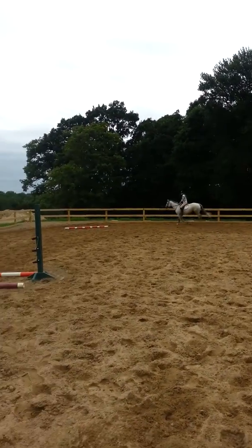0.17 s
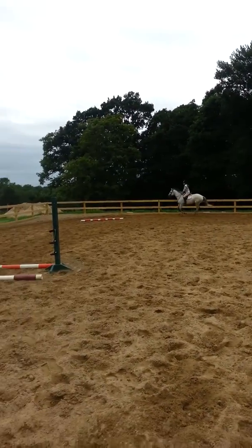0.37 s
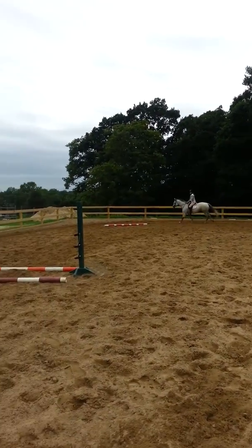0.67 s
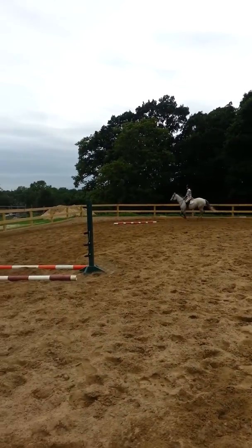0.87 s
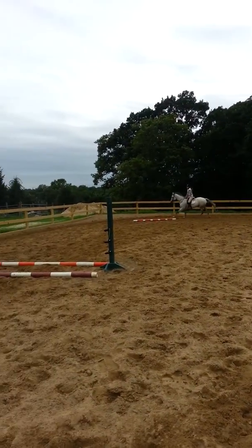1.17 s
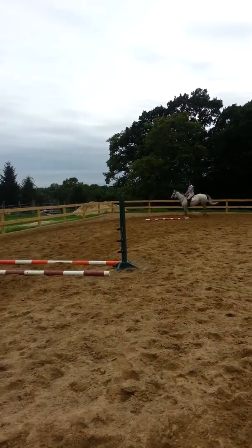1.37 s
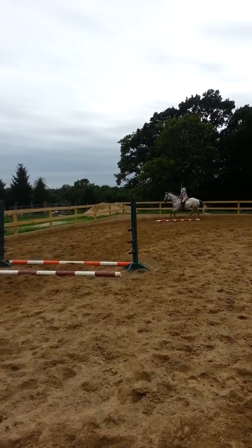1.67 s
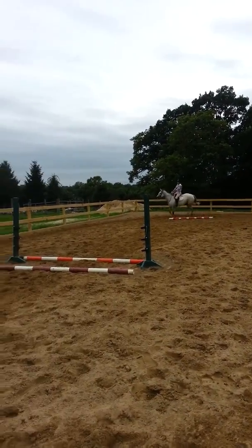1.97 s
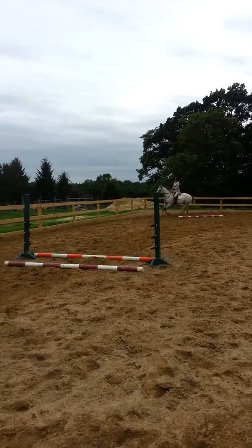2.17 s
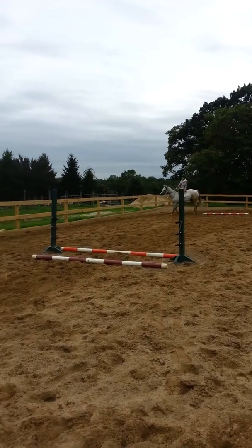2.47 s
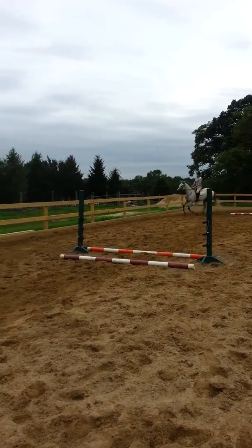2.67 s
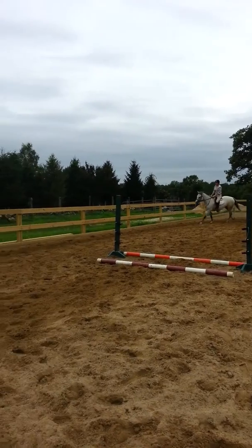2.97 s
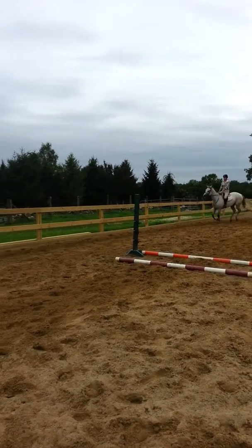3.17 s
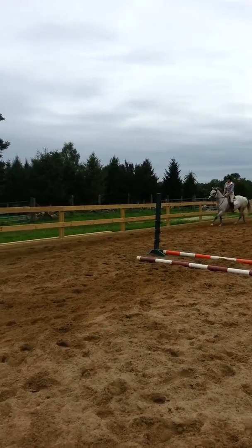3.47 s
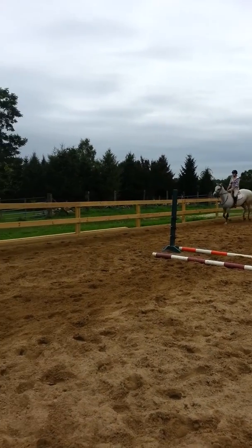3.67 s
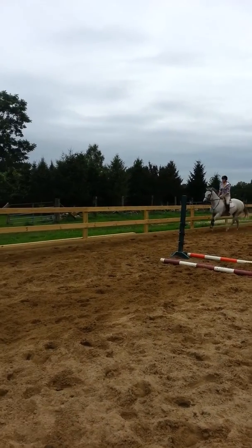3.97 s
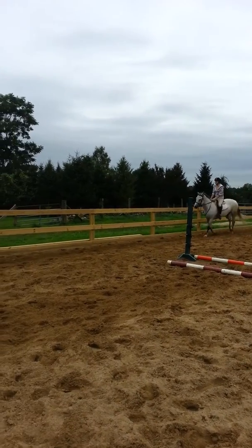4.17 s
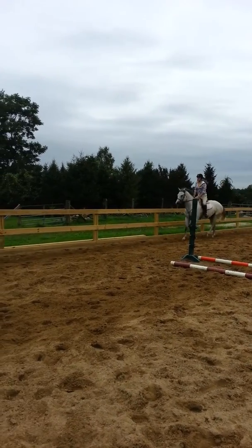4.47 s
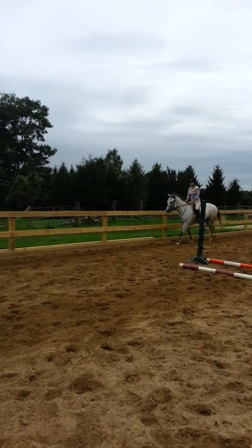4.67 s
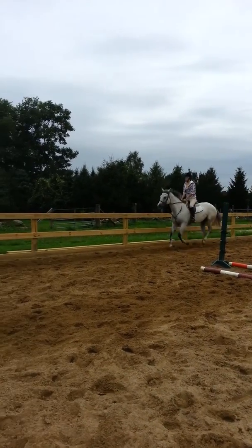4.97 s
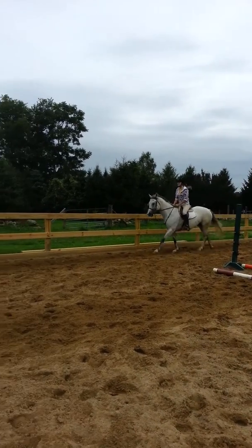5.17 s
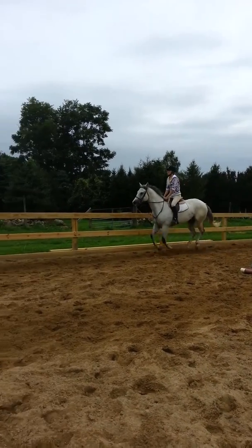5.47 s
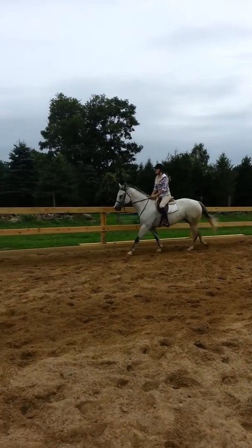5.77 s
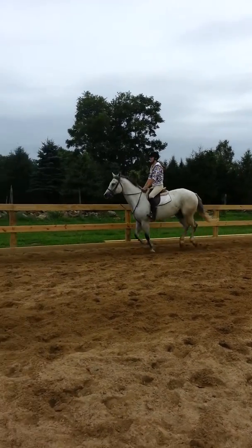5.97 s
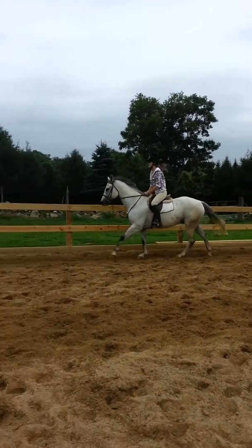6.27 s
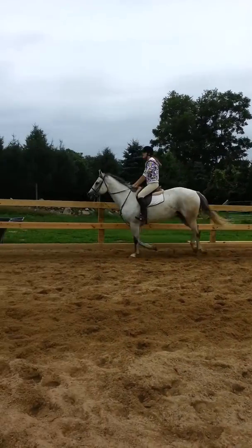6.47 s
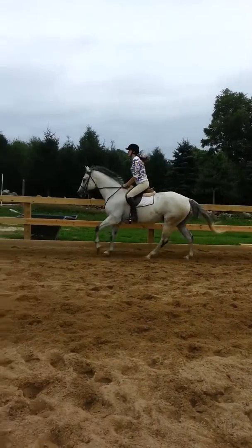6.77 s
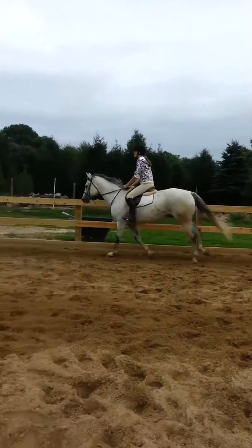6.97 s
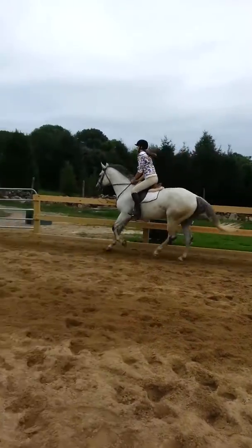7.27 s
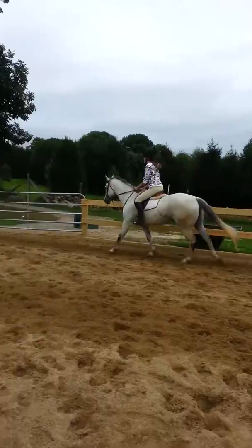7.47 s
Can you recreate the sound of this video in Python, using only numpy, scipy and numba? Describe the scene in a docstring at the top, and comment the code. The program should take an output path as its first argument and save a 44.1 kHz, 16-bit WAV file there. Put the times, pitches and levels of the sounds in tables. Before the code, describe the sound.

Wind dominates: deep, bumpy, gritty bursts striking the left side first, then both sides separately. A cantering horse is heard mainly by breathy puffs from the middle onward, with a stronger snort late, and dry little tack ticks. A faint bird repeats a quick falling chirp, another gives short rising whistles, and a weak wavering drone passes. Distant murmur and hiss remain as the wind dies.

```python
"""Wind thumps and buffets first one port, then the other, of a small stereo microphone with no windshield.
Close under it a horse cantering round a sand arena blows and snorts, as breath noise through nostril
resonances, and tack ticks as brief noise clicks. Farther off, two birds call in gliding sines, a faint
tone drones, and the countryside murmurs in noise bands over a flat hiss. Wind is noise whose pitch
follows its level, plus single eddies of a few swings each."""
import sys
import numpy as np
from scipy import signal
from scipy.io import wavfile
from scipy.ndimage import uniform_filter1d
from numba import njit

SR = 44100
rng = np.random.default_rng(int(sys.argv[2]) if len(sys.argv) > 2 else 0)


def wav_out(sig):
    """Save sig, one row per channel (or a flat mono array), as 16-bit PCM at SR to the path in sys.argv[1]."""
    wavfile.write(sys.argv[1], SR, np.round(np.clip(np.atleast_2d(sig).T, -1, 1) * 32767).astype(np.int16))


N = 335601
T = np.arange(N) / SR   # time, s


def amp(db):
    """Turn dB into gain."""
    return 10 ** (np.asarray(db) / 20)


def rms_one(x):
    """Scale to rms 1."""
    return x / np.sqrt(np.mean(x ** 2) + 1e-20)


def at_hz(points, hz):
    """Read a spectrum between its points on a log frequency axis."""
    points_hz, values = np.transpose(points)
    return np.interp(np.log(hz), np.log(points_hz), values)


def drift(rate_hz):
    """Slow random wander of spread 1: low-passed noise, made at one sample in 40 and interpolated."""
    r = np.exp(-80 * np.pi * rate_hz / SR)
    white = rng.standard_normal(N // 40 + 2002)
    slow = signal.lfilter([1], [1, -2 * r, r * r], white)[2000:]   # skip the filter's start
    return np.interp(np.arange(N) / 40, np.arange(len(slow)), rms_one(slow))


def add(track, start_s, sound):
    """Mix a sound into the track at its start time."""
    i = max(round(start_s * SR), 0)
    track[i:i + len(sound)] += sound[:len(track) - i]


def resonance(x, centre_hz, width_hz):
    """Two-pole resonance with gain 1 at its peak."""
    r = np.exp(-np.pi * width_hz / SR)
    numerator = np.array([1, 0, -1]) * (1 - r * r) / 2
    return signal.lfilter(numerator, [1, -2 * r * np.cos(2 * np.pi * centre_hz / SR), r * r], x)


def band_noise(white, low_hz, high_hz):
    """Keep one band of a noise."""
    return signal.sosfilt(signal.butter(2, [low_hz, high_hz], "band", fs=SR, output="sos"), white)


HISS_DB = -60   # before the swell


def hiss(wind_db, knee_db=-24, most_db=5):
    """Flat noise, separate in each channel, that swells in both with the stronger port's wind."""
    push = uniform_filter1d(amp(wind_db).max(axis=0), size=2000)
    swell_db = most_db * np.tanh(push / amp(knee_db))
    return amp(HISS_DB + swell_db + 0.13 * drift(13)) * rng.standard_normal((2, N))


# spectrum of the far countryside: (band_hz, relative level_db per Hz)
MURMUR_SPECTRUM = [(40, -37), (76, -4), (124, 3), (225, -6.5), (350, -5.5), (600, -7.5), (963, -10),
                   (1400, -15), (2000, -17.5), (3500, -21), (4500, -20), (6000, -86), (9000, -15)]
# how alike the murmur is at the two ports: (band_hz, likeness from 0 separate to 1 same)
PORT_LIKENESS = [(100, 0.61), (300, 0.69), (640, 0.88), (1400, 0.69), (3100, 0.077), (6000, 0.41)]
MURMUR_DB, MURMUR_PAN_DB = -48, 1.5   # level before the opening dip; left over right


def murmur(patchy_db=0.3):
    """Far traffic and leaves: half-octave noise bands, each flickering; it opens 3 dB down, then rises."""
    out, together = 0, drift(1.2)
    edges_hz = 35 * 2 ** np.arange(0, 8.1, .5)
    white = rng.standard_normal((2, 2, N))
    for k, (low_hz, high_hz) in enumerate(zip(edges_hz, edges_hz[1:])):
        centre_hz = np.sqrt(low_hz * high_hz)
        mid, side = band_noise(white[k % 2], low_hz, high_hz)   # neighbouring bands use separate noise
        alike = np.clip(at_hz(PORT_LIKENESS, centre_hz), -1, 1)
        flicker_db = patchy_db * (0.23 * together + drift(24))
        gain = amp(at_hz(MURMUR_SPECTRUM, centre_hz) + flicker_db)
        stereo = np.sqrt(1 + alike) * mid + np.sqrt(1 - alike) * side * [[1], [-1]]
        out = out + gain * stereo
    opening_dip = amp(-3 * np.exp(-T / .5))
    pan = amp([[MURMUR_PAN_DB / 2], [-MURMUR_PAN_DB / 2]])
    return amp(MURMUR_DB) * opening_dip * rms_one(out) * pan


# a faint far drone, before it wavers: (time_s, level_db, pitch_hz)
DRONE_PATH = [(4.8, -80, 660), (5.3, -64, 640), (5.7, -60, 590), (6.1, -65, 580), (6.5, -80, 580)]


def drone():
    """A far sine whose pitch and level both wander, so it sounds wavering and breathy."""
    time_s, level_db, pitch_hz = np.transpose(DRONE_PATH)
    wavering_hz = np.interp(T, time_s, pitch_hz) + 15 * drift(20)
    turns = np.cumsum(wavering_hz) / SR
    return amp(np.interp(T, time_s, level_db) + 3 * drift(15)) * np.sin(2 * np.pi * turns)


def note(track, start_s, level_db, rows):
    """A sine gliding along (time_s, pitch_hz, level_db) rows, soft at both ends."""
    time_s, pitch_hz, row_db = np.transpose(rows)
    t = np.arange(time_s[0], time_s[-1], 1 / SR)
    turns = np.cumsum(np.interp(t, time_s, pitch_hz)) / SR
    tone = np.sqrt(2) * np.sin(2 * np.pi * turns)   # rms 1
    loudness = amp(level_db + np.interp(t, time_s, row_db)) * signal.windows.tukey(len(t), .3)
    add(track, start_s + time_s[0], loudness * tone)


# the first bird's phrase, three notes each of rows: (time_s into the phrase, pitch_hz, relative level_db)
PHRASE_NOTES = [
    [(0, 3900, 1), (.014, 3900, -4), (.026, 4300, -4)],
    [(.02, 3350, -3), (.03, 3050, 2), (.042, 3400, -2)],
    [(.052, 2650, -2), (.074, 3095, 7), (.086, 2900, 5)],
]
# when it sings the phrase: (start_s, level_db, first_note_extra_db)
PHRASE_CALLS = [(0.494, -61, 5), (1.585, -63, 0), (3.263, -62, 0), (4.536, -56, 0), (5.811, -63, 0)]
# the second bird's rising whistles: (start_s, length_s, start_pitch_hz, level_db, flick_extra_db)
WHISTLE_CALLS = [(5.08, 0.072, 1756, -60.5, 0), (5.469, 0.082, 1810, -57, 2), (5.728, .046, 1950, -64, 9)]
CLIMB_HZ_PER_S, FLICK_HZ, FLICK_S = 8300, 1100, 0.019   # a steady climb, then a last upward flick


def birds():
    """Two singers of gliding notes: moving air makes them waver, and trees add a short noise-tail blur."""
    out = np.zeros(N)
    for start_s, level_db, first_db in PHRASE_CALLS:
        for k, rows in enumerate(PHRASE_NOTES):
            note(out, start_s, level_db + first_db * (k == 0), rows)
    for start_s, length_s, pitch_hz, level_db, flick_db in WHISTLE_CALLS:
        knee_s = length_s - FLICK_S
        knee_hz = pitch_hz + CLIMB_HZ_PER_S * knee_s
        note(out, start_s, level_db, [(0, pitch_hz, 0), (knee_s, knee_hz, 0),
                                      (knee_s + FLICK_S / 4, knee_hz + FLICK_HZ / 8, flick_db),
                                      (length_s, knee_hz + FLICK_HZ, flick_db)])
    out *= amp(3.0 * drift(60))
    t = T[:SR // 8]
    trees = rng.standard_normal(len(t)) * np.exp(-t / 0.03)
    blur = signal.fftconvolve(out, trees / np.linalg.norm(trees))[:N]
    return out + amp(-9) * blur


# tack and grit, before panning: (time_s, peak_level_db, centre_hz)
TACK_TICKS = [(0.293, -42, 3500), (1.427, -44, 3400), (1.527, -45, 3800), (1.56, -46, 3600),
              (4.245, -49, 3560), (5.36, -46, 4500), (5.92, -41, 3500), (6.28, -44, 3780),
              (6.479, -39, 4200), (6.578, -33, 2760), (7.05, -42, 2410)]


def ticks():
    """Short broad clicks: a few ms of decaying noise through a wide resonance."""
    out, t = np.zeros(N), T[:SR // 50]
    noises = rng.standard_normal((len(TACK_TICKS), len(t)))
    for (time_s, peak_db, centre_hz), noise in zip(TACK_TICKS, noises):
        click = resonance(noise * np.exp(-t / .0045), centre_hz, .7 * centre_hz)
        add(out, time_s - .002, amp(peak_db) * click / np.abs(click).max())
    return out


# the horse's breaths, before flutter and panning: (start_s, level_db, rise_s, hold_s, fall_by_60_db_s)
BREATHS = [(3.557, -48.5, 0.038, 0.11, 0.8), (4.198, -53, 0.017, 0.026, 0.26),
           (5.339, -49, 0.021, 0.016, 0.12), (5.794, -49.5, 0.031, 0.12, 0.12),
           (6.33, -53, 0.025, 0.13, 0.36), (6.69, -43, 0.019, 0.079, 0.61), (6.8, -57.5, 0.08, 0.18, 0.32)]
# nostril flutter of the snort: (first_flap_s, flaps_per_s, fade_s, depth as log gain)
SNORT_FLUTTER = (6.73, 24, .05, .55)
# nostril resonances: (centre_hz, width_hz, relative level_db)
NOSTRIL_PEAKS = [(760, 660, 1), (1280, 510, 4), (2070, 1300, -3.5), (3560, 1300, -3)]


def horse():
    """Breath noise through nostril resonances; the loudest flutters. Fence and ground scatter part of it."""
    puff, t = np.zeros(N), T[:SR]
    for start_s, level_db, rise_s, hold_s, fall_s in BREATHS:
        fall_db = -60 * np.maximum(t - hold_s, 0) / fall_s
        add(puff, start_s, amp(level_db + fall_db) * (1 - np.exp(-(t / rise_s) ** 2)))
    flap_s, flaps_per_s, fade_s, depth = SNORT_FLUTTER
    flaps = np.exp(-np.abs(T - flap_s) / fade_s) * np.cos(2 * np.pi * flaps_per_s * (T - flap_s))
    puff *= np.exp(depth * flaps)
    air = rng.standard_normal(N) + 0.8 * rng.standard_normal((2, N))   # shared, plus scatter at each port
    nose = 0
    for k, (centre_hz, width_hz, peak_db) in enumerate(NOSTRIL_PEAKS):
        nose = nose + amp(peak_db) * resonance(air, centre_hz, width_hz) * (-1) ** k   # alternate polarity
    return puff * rms_one(nose) * amp(1.5 * drift(40))


@njit
def moving_band(x, turn, damping):
    """A band-pass and two low-pass resonators in a row, at 1, 1.5 and 2 times a moving pitch."""
    out, low, band = np.zeros(len(x)), np.zeros(3), np.zeros(3)
    for i in range(len(x)):
        v = x[i]
        for k in range(3):
            step = turn[i] * (k + 2) / 2   # radians per sample
            low[k] += step * band[k]
            band[k] += step * (v - low[k] - damping * band[k])
            v = low[k] if k else band[k]
        out[i] = v
    return out


# wind at the left and at the right port, before lumps and ceiling: (time_s, level_db)
LEFT_GUSTS = [(0.0, -48), (0.3, -54), (0.48, -36), (0.74, -51.5), (0.84, -28.5), (1.02, -40), (1.08, -32.5),
              (1.28, -41), (1.88, -36.5), (2.16, -24), (2.31, -24), (2.36, -12.5), (2.5, -26.5), (2.55, -9),
              (2.69, -20), (2.84, -58), (3.04, -29.5), (3.14, -13), (3.32, -26), (3.52, -18.5),
              (3.76, -22.5), (3.86, -35.5), (3.9, -23.5), (4.06, -37), (4.22, -31), (4.32, -57),
              (4.46, -25), (4.7, -64), (4.82, -17.5), (4.92, -26), (5.02, -45), (5.14, -34.5), (5.4, -50),
              (5.48, -40), (6.1, -65), (6.48, -21.5), (6.62, -51), (6.77, -42), (6.82, -20), (6.88, -45),
              (7.48, -44), (7.6, -64)]
RIGHT_GUSTS = [(0.0, -54.5), (2.04, -54), (2.1, -40.5), (2.78, -29), (2.85, -42), (2.93, -32), (3.03, -42),
               (3.1, -30.5), (3.32, -26.5), (3.44, -39), (3.78, -31.5), (4.08, -58), (4.16, -30.5),
               (4.28, -30.5), (4.32, -51.5), (4.44, -25.5), (4.56, -37), (4.67, -49), (4.72, -25),
               (4.84, -53.5), (4.96, -25), (5.01, -46), (5.14, -31.5), (5.29, -47), (5.37, -29), (5.7, -36),
               (5.86, -30.5), (6.02, -31.5), (6.1, -50), (6.17, -31), (6.36, -31.5), (6.68, -49),
               (6.85, -23.5), (6.92, -44.5), (7.1, -51.5), (7.27, -38.5), (7.6, -56)]
EDDY_HZ, EDDY_OCTAVES_PER_DB = 190, .035   # filter pitch at -23.5 dB, and how it climbs with the wind


def wind(gusts, lumpy_db=7.5):
    """Turbulence at one port: faster air is louder and its eddies pass quicker, so higher."""
    level_db = np.interp(T, *np.transpose(gusts))
    lumps_db = lumpy_db * np.tanh(.9 * drift(24))
    lumps_db = np.minimum(lumps_db, -16 - level_db)   # -16 dB ceiling leaves room for the single eddies
    pitch_hz = EDDY_HZ * 2 ** (EDDY_OCTAVES_PER_DB * (level_db + 0.9 * lumps_db + 23.5))
    rumble = moving_band(rng.standard_normal(N), 2 * np.pi * pitch_hz / SR, 1.43)
    rumble = rumble / np.sqrt(uniform_filter1d(rumble ** 2, size=900))   # even out, so lumps set the level
    return amp(level_db + lumps_db) * rumble, level_db


# strongest single eddies, each at one port: (centre_s, nominal level_db, pitch_hz, nominal length_s,
# port 0 left 1 right)
EDDIES = [(0.833, -17.5, 150, 0.015, 0), (.875, -13, 235, 0.005, 0), (1.075, -15, 230, .005, 0),
          (1.099, -18, 252, 0.015, 0), (1.181, -14.5, 162, 0.016, 0), (1.415, -23, 189, 0.023, 0),
          (1.515, -25.5, 178, 0.027, 0), (1.587, -24, 178, 0.014, 0), (1.696, -24.5, 190, .012, 0),
          (1.778, -16, 164, 0.0099, 0), (1.951, -16, 191, 0.027, 0), (1.972, -16, 248, 0.0057, 0),
          (2.04, -13, 156, 0.013, 0), (2.081, -21, 159, .013, 0), (2.146, -5.5, 284, 0.019, 0),
          (2.169, -10.5, 235, 0.02, 0), (2.206, -9.5, 240, .006, 0), (2.229, -15, 309, 0.012, 0),
          (2.348, -1.5, 284, 0.02, 0), (2.419, -4.5, 237, 0.006, 0), (2.436, -9, 210, 0.012, 0),
          (2.457, -10, 194, 0.024, 0), (2.48, -8, 253, 0.0045, 1), (2.535, -3, 234, 0.014, 0),
          (2.549, 0.5, 239, 0.013, 0), (2.572, -2, 295, 0.017, 0), (2.601, -2.5, 260, 0.015, 0),
          (2.631, -1.5, 240, 0.012, 0), (2.643, 1, 287, .008, 0), (2.672, -8.5, 280, 0.027, 0),
          (3.082, -9.5, 436, 0.0072, 0), (3.092, -11, 228, 0.041, 0), (3.117, -7, 224, 0.015, 1),
          (3.123, -4.5, 280, 0.01, 0), (3.147, -2.5, 262, 0.025, 0), (3.161, 2.5, 255, 0.0046, 0),
          (3.172, -3.5, 243, 0.018, 0), (3.197, 1.5, 326, 0.0038, 0), (3.213, -1, 350, 0.0061, 0),
          (3.247, -4, 284, 0.0073, 0), (3.26, -6.5, 133, 0.0113, 1), (3.284, -11, 185, 0.014, 1),
          (3.33, -6, 181, 0.0054, 1), (3.353, -10.5, 200, .006, 0), (3.39, -13.5, 237, 0.0053, 1),
          (3.461, -6, 189, 0.0089, 0), (3.5, -3, 222, 0.0098, 0), (3.506, -4, 230, 0.0084, 0),
          (3.596, -7.5, 220, 0.019, 0), (3.612, -3.5, 249, 0.016, 0), (3.623, -2, 274, 0.0065, 0),
          (3.716, -5.5, 225, 0.012, 0), (3.737, -17, 219, 0.014, 0), (3.764, -15, 210, 0.012, 0),
          (3.9, -8.5, 243, 0.012, 0), (3.971, -19, 292, 0.017, 0), (4.014, -14.5, 227, 0.0071, 0),
          (4.397, -17.5, 194, 0.0082, 0), (4.456, -20, 170, 0.015, 1), (4.544, -14.5, 207, 0.0067, 1),
          (4.701, -11, 190, 0.0067, 1), (4.805, -3.5, 254, 0.012, 0), (4.826, -13, 208, 0.014, 0),
          (4.854, -16, 198, 0.0091, 0), (4.929, -21, 163, 0.019, 0), (4.881, -10.5, 199, 0.013, 0),
          (5.082, -15.5, 206, 0.011, 1), (5.143, -20, 194, 0.0097, 0), (5.148, -11, 182, 0.0045, 1),
          (5.384, -17.5, 237, 0.0067, 1), (5.443, -13, 235, 0.0086, 1), (5.457, -16, 247, 0.008, 1),
          (5.504, -22.5, 136, .03, 0), (5.554, -14.5, 172, .014, 1), (5.631, -19.5, 195, 0.016, 1),
          (5.815, -17.5, 208, 0.0086, 1), (5.854, -7, 260, 0.007, 1), (5.861, -22, 178, 0.0082, 0),
          (5.881, -16.5, 164, 0.016, 1), (6.166, -18.5, 166, 0.016, 1), (6.253, -11.5, 188, 0.017, 1),
          (6.301, -18, 120, 0.035, 0), (6.325, -10, 188, .008, 1), (6.34, -10.5, 210, .011, 1),
          (6.401, -11.5, 184, 0.008, 1), (6.451, -11.5, 176, 0.0092, 0), (6.475, -11.5, 236, 0.026, 0),
          (6.519, -11.5, 188, 0.015, 0), (6.82, -13, 170, 0.02, 0), (6.85, -19, 259, 0.041, 1),
          (7.199, -28.5, 150, .02, 1), (7.29, -26, 150, 0.022, 1), (7.431, -32.5, 160, .02, 0),
          (7.53, -32.5, 170, .015, 1)]


def buffets():
    """Each eddy is a few gliding swings; strong ones break up into finer whirls that sound gritty."""
    out, chance = np.zeros((2, N)), rng.random((len(EDDIES), 4))
    t = np.arange(-.06, .06, 1 / SR)
    whirls = rng.standard_normal((len(EDDIES), len(t)))
    for (centre_s, level_db, pitch_hz, length_s, port), (a, b, c, d), noise in zip(EDDIES, chance, whirls):
        bell = 2 ** (-(2.61 * t / length_s) ** 2)
        glide = 1 - 0.098 * (c - .4) * t / length_s
        turns = pitch_hz * t * glide + 0.26 * (a - .5)
        swing = -np.cos(2 * np.pi * turns)
        swing += 0.45 * np.cos(2 * np.pi * ((1.26 + .5 * d) * turns + b))
        swing += 0.5 * np.cos(2 * np.pi * (0.657 * turns + d))
        grit = rms_one(band_noise(noise, 1.54 * pitch_hz, 2.536 * pitch_hz))
        swing = bell * swing + amp(0.35 * level_db - 18) * bell ** 0.37 * grit
        point = np.exp(-np.hypot(turns, .07) / .09)   # sharpens the downward swing at the centre
        swing -= amp(.6 * level_db - 9) * point
        add(out[int(port > .5)], centre_s + t[0], amp(level_db - 2.5) * swing)
    return out


PORT_LAG = 3   # samples by which horse, birds and countryside reach the left port later


def scene():
    """Wind on each port by itself, the sounds of the place on both."""
    left, left_db = wind(LEFT_GUSTS)
    right, right_db = wind(RIGHT_GUSTS)
    place = (horse() + ticks() + birds() + drone()) * amp([[1.5], [-1.5]])   # 3 dB stronger on the left
    place = place + murmur()
    place[0] = np.roll(place[0], PORT_LAG)
    return np.array([left, right]) + buffets() + place + hiss(np.array([left_db, right_db]))


CUTOFF_HZ = 14500   # top of the microphone's range


def record(dry):
    """The microphone chain: steep bass cut, rounded overload at full scale, steep treble cut."""
    x = signal.sosfilt(signal.butter(7, 55, "high", fs=SR, output="sos"), dry)
    x = x / (1 + np.abs(x) ** 14) ** (1 / 14)
    return signal.sosfilt(signal.ellip(12, .5, 75, CUTOFF_HZ, fs=SR, output="sos"), x)


dry = scene()
out = record(dry)
wav_out(out)
```